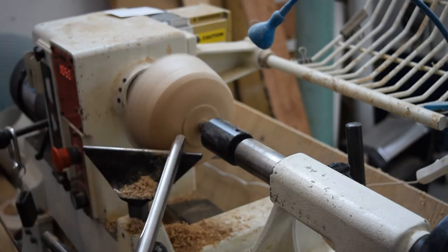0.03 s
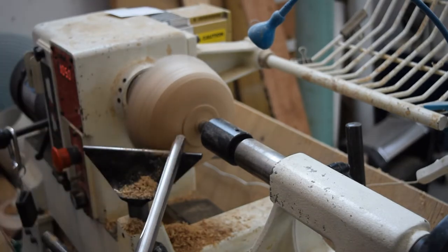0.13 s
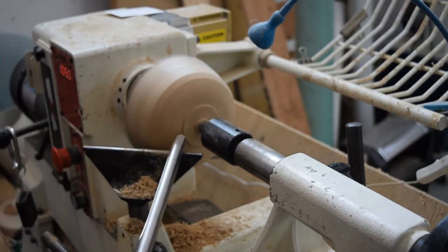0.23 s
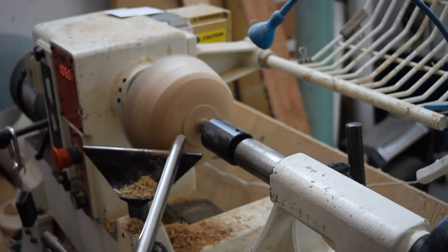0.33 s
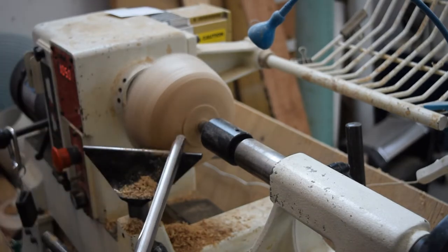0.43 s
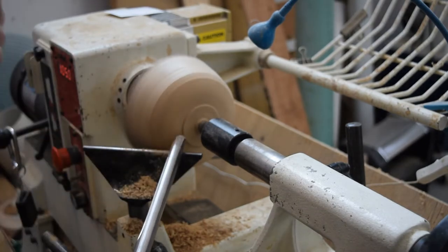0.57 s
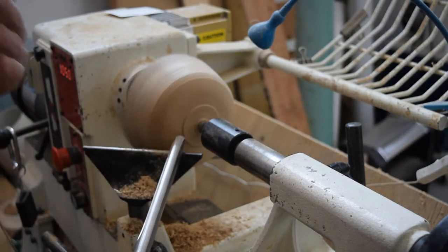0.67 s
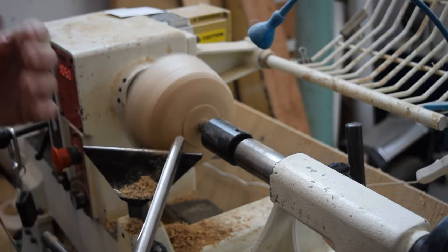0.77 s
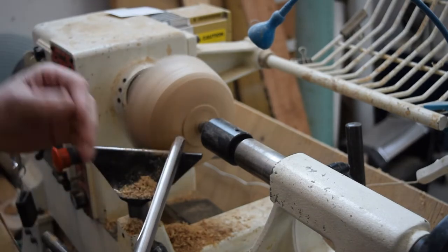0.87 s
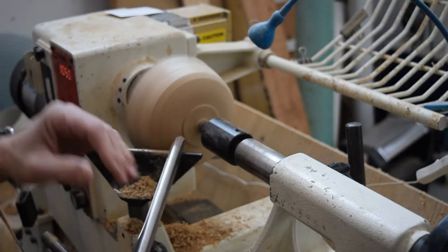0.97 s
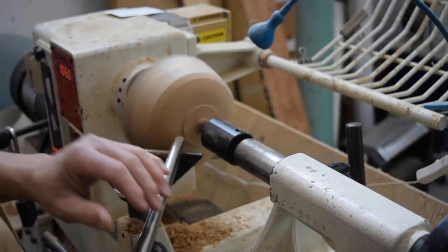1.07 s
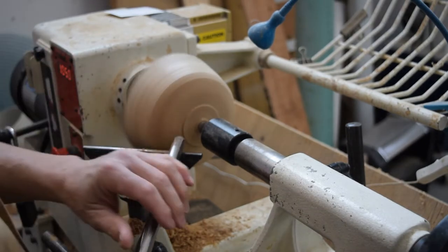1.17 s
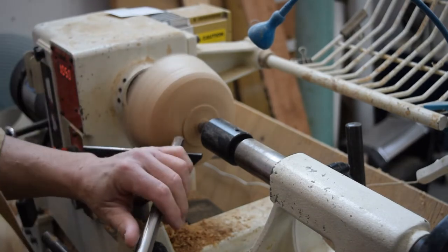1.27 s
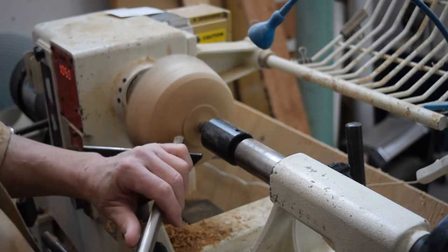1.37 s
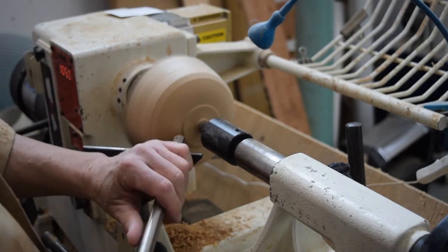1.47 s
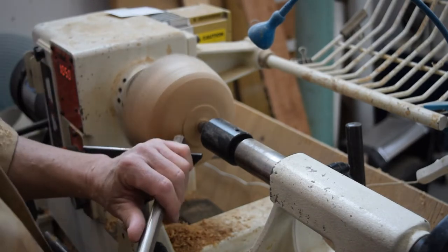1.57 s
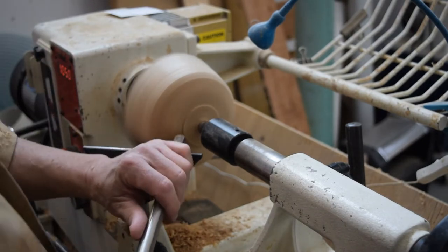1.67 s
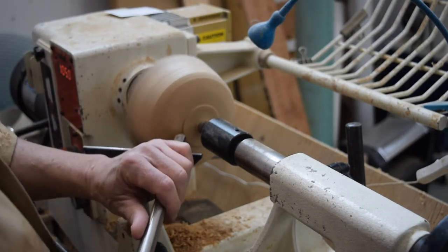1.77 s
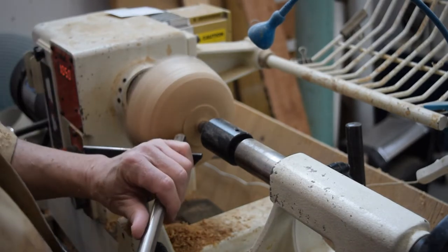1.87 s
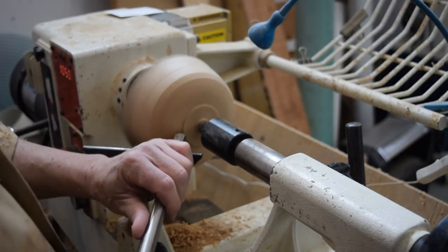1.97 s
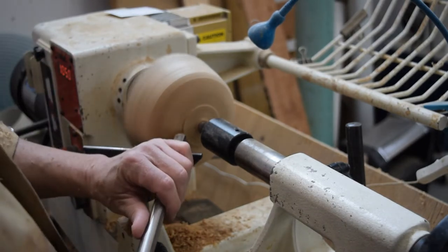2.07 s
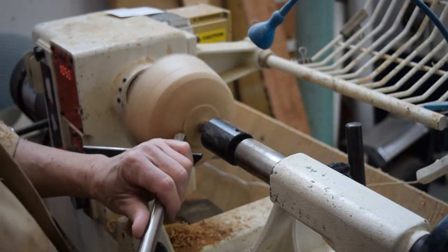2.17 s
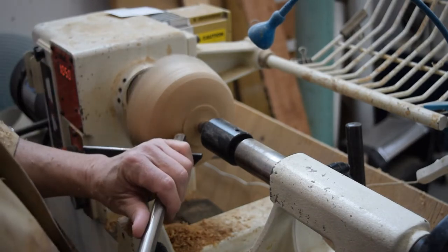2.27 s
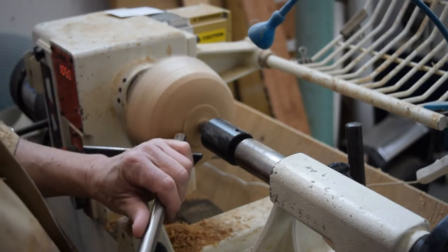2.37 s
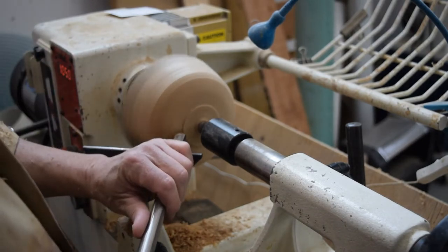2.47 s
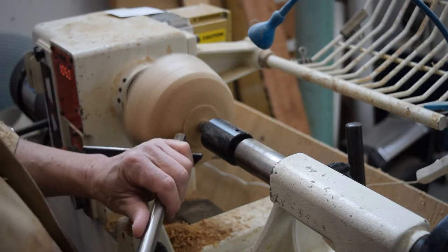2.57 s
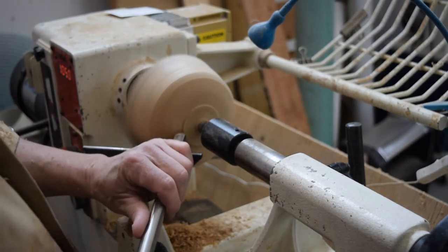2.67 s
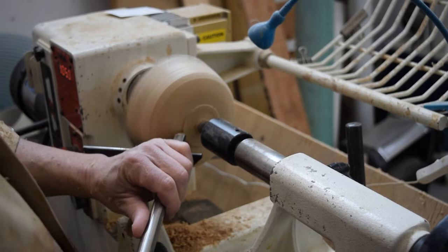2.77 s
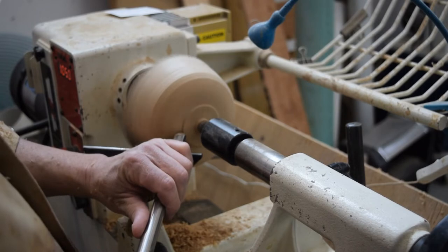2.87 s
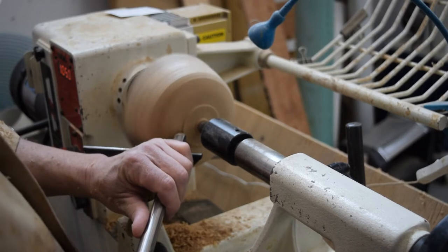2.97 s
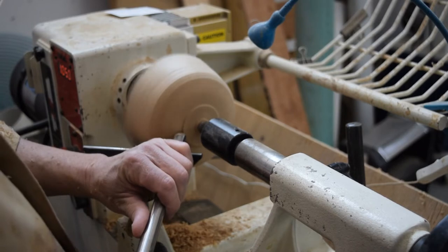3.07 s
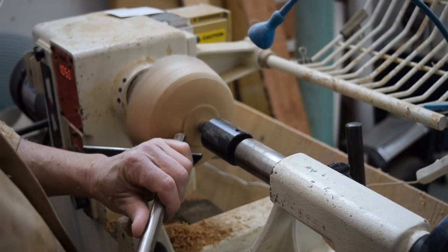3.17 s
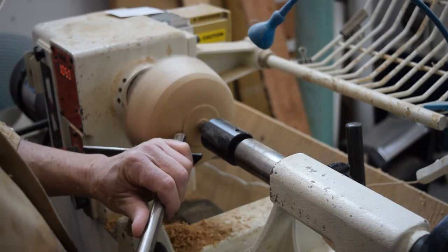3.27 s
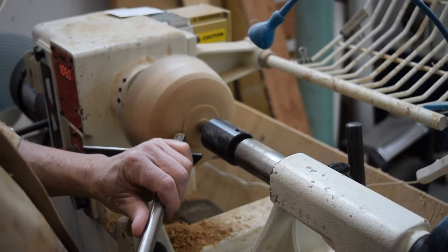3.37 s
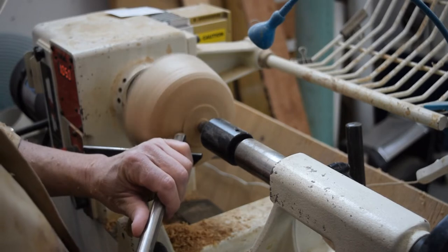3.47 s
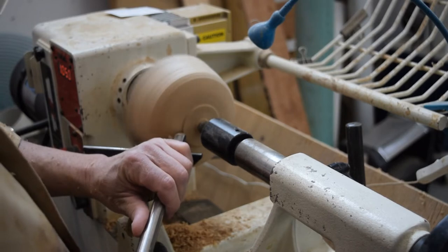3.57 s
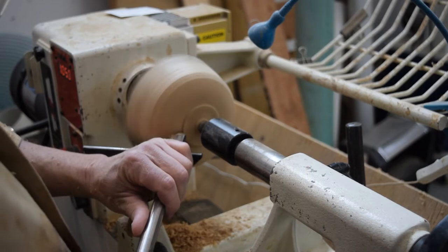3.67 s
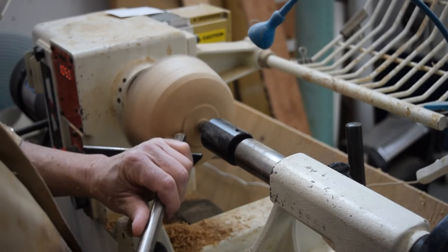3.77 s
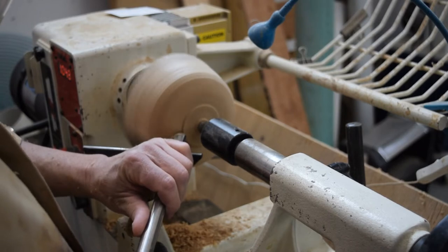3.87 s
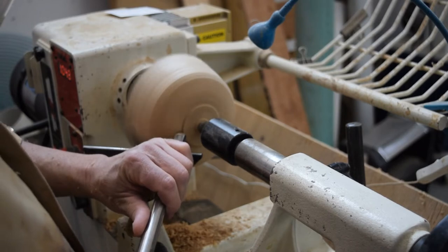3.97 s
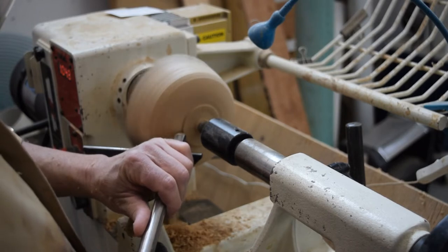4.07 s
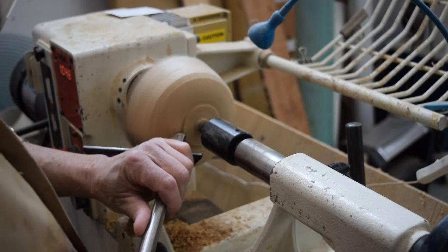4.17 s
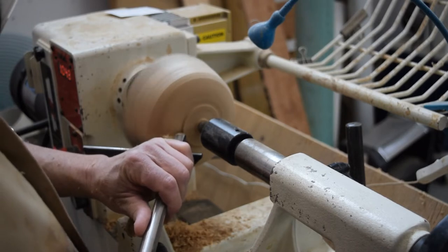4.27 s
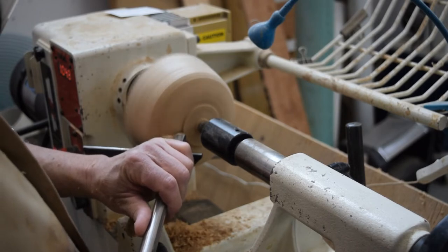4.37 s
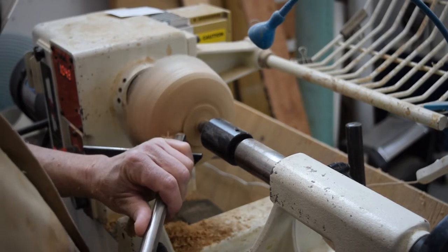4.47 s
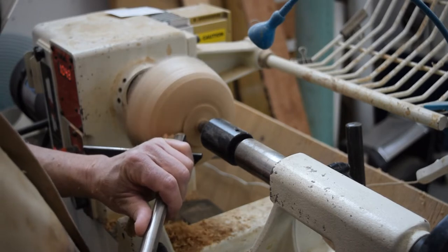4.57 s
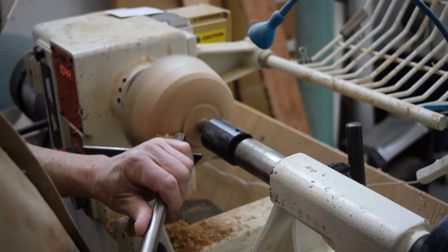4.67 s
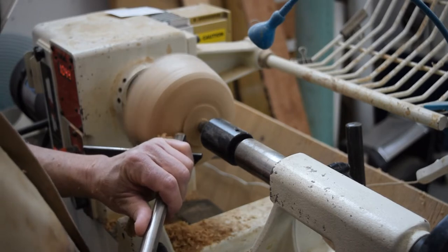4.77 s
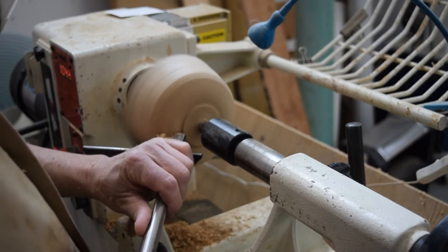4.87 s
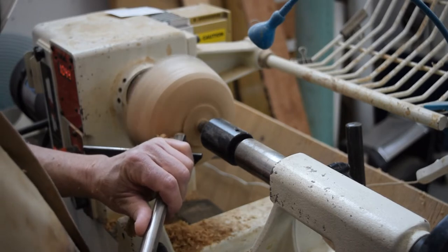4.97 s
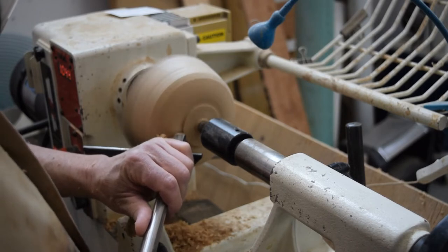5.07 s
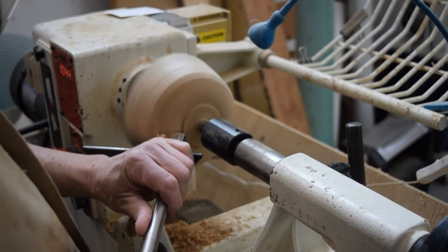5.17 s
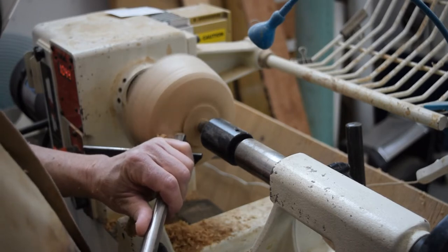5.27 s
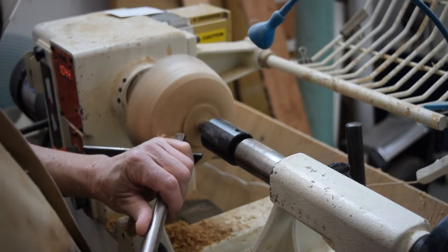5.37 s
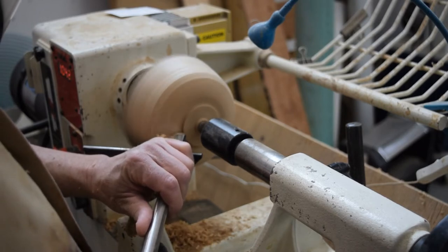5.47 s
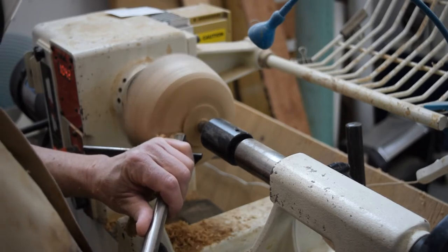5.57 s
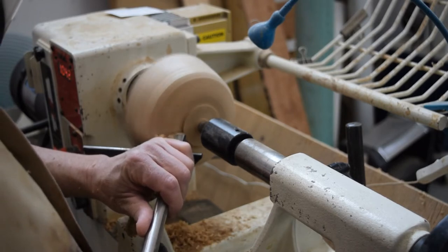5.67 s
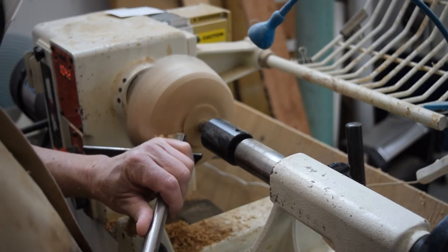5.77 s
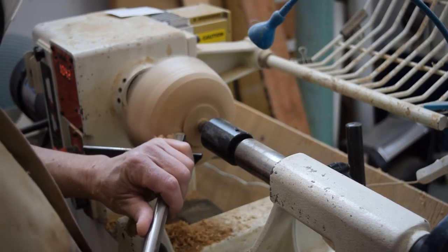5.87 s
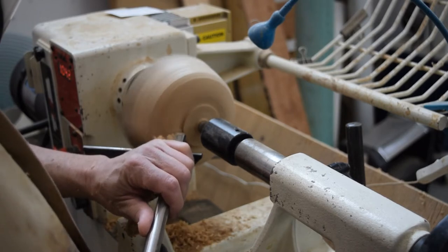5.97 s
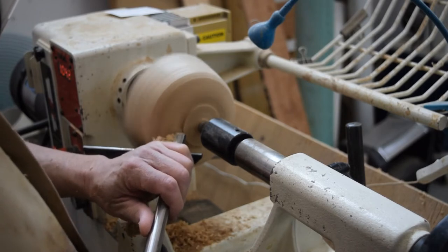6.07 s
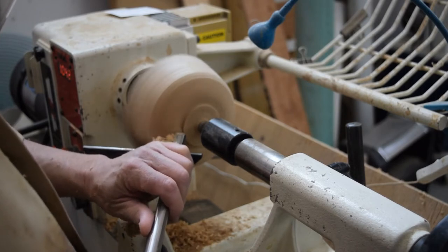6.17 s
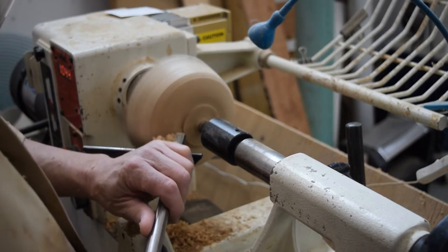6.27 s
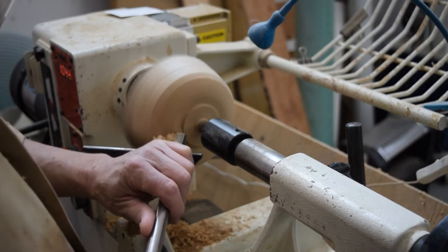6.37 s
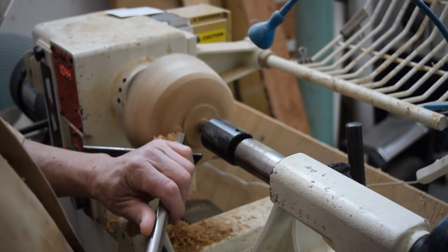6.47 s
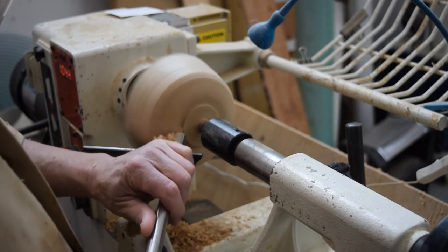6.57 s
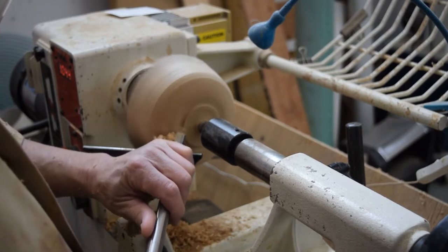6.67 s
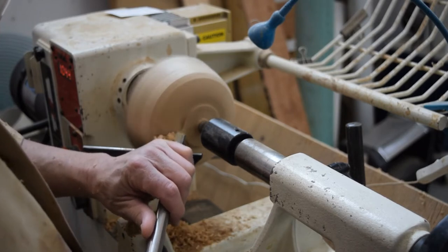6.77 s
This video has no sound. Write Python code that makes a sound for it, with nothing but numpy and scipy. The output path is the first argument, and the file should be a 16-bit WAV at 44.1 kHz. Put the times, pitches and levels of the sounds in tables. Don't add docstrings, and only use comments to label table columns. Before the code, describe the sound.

From 0 to about 2.3 seconds a wood lathe idles in a workshop: a steady electric hum around one kilohertz with a higher tone above it, soft bearing hiss and a thin, constant whine near ten kilohertz. At 2.4 the gouge touches the spinning dry bowl, with a few rough, uneven knocks that quickly merge into a rapid metallic rattle, about thirty-five pulses a second, ringing brightly at three to four kilohertz with crisp chip fizz. From 3.4 the cut deepens; by 4.4 to 5.8 it is a loud, dense, hollow roar with wall chatter and wavering, singing tones from the tool rest. Around 5.9 it drops abruptly to a lighter, clearer, ticking scrape, continuing until a harder bite at 6.8, where it ends mid-cut. The motor continues underneath throughout. The microphone is close, the stereo image slightly left, with short room reflections.

```python
import sys
import numpy as np
from scipy import signal
from scipy.fft import rfft, irfft, next_fast_len
from scipy.io import wavfile
from scipy.ndimage import uniform_filter1d

SR = 44100
rng = np.random.default_rng(int(sys.argv[2]) if len(sys.argv) > 2 else 0)


def int16_out(signal):
    q = np.round(np.clip(np.atleast_2d(signal).T, -1, 1) * 32767)
    wavfile.write(sys.argv[1], SR, q.astype(np.int16))


def nominal_scale(level):
    x = np.asarray(level, float) / 20
    return 10 ** x


N = 300762
T = np.arange(N) / SR
SPINDLE_HZ, SHAFT_HZ = 17.65, 21.0985
TOUCH_S, SWEEP_S, ROUNDING_S = 2.4, 4.4, 0.12


def evened(x):
    return x / np.sqrt(np.mean(x ** 2) + 1e-20)


def read(points, hz, column=1):
    table = np.transpose(points)
    return np.interp(np.log(hz + 1), np.log(table[0] + 1), table[column])


def curves(rows, before):
    s, *columns = np.transpose(rows)
    return [np.interp(T, s, column, left=before) for column in columns]


def colour(x, spectrum, modes, size=8192):
    hz = abs(np.fft.fftfreq(size, 1 / SR))
    humps = 1 + sum(nominal_scale(2 * db) / (1 + (2 * (hz - mode_hz) / width_hz) ** 2) for mode_hz, width_hz, db in modes)
    smooth = nominal_scale(np.maximum(read(spectrum, hz), -100))
    log_gain = np.log(smooth) + np.log(humps) / 2
    taps = np.fft.ifft(np.exp(np.conj(signal.hilbert(log_gain)))).real[:size // 2]
    return signal.oaconvolve(x, taps / np.linalg.norm(taps))[:N]


def one_mode(x, hz, width_hz):
    skirts = [(hz / 8, -75), (hz / 2, -42), (hz * 2, -42), (SR, -60)]
    return colour(x, skirts, [(hz, width_hz, 40)])


def wander(rate_hz, count=12):
    frame_s = np.arange(0, N + 256, 256) / SR
    rates = np.geomspace(rate_hz / 20, rate_hz, count)
    slow = sum(np.sin(2 * np.pi * (f * frame_s + rng.random())) for f in rates)
    return np.interp(T, frame_s, evened(slow))


def held(rows, rise_s=.1, fall_s=.2):
    out = np.zeros(N)
    for start_s, length_s, db in rows:
        rise = (T - start_s) / rise_s + .5
        fall = (start_s + length_s - T) / fall_s + .5
        shape = np.clip(np.minimum(rise, fall), 0, 1)
        out += nominal_scale(db) * np.sin(np.pi / 2 * shape) ** 2
    return out


def returning(turns, keep, size=2048):
    rows = rng.standard_normal((int(turns[-1]) + 3, size))
    keep = np.clip(keep, 0, .99)
    rows = signal.lfilter([np.sqrt(1 - keep ** 2)], [1, -keep], rows, axis=0, zi=keep * rows[-1:])[0]
    place = (turns % 1 * size).astype(int)
    return evened(rows[turns.astype(int), place])


# time in seconds, level in dB.
DEPTH_DB = [(2.28, -51), (2.37, -37.5), (2.41, -35), (2.5, -32.5), (2.7, -31.5), (2.85, -27), (3.1, -26),
            (3.3, -27.5), (3.7, -23), (4.3, -20.5), (4.6, -19.5), (5.0, -20), (5.4, -20.5), (5.77, -21),
            (5.97, -27), (6.3, -29.5), (6.74, -29), (6.82, -23)]


def cut_depth_db():
    return curves(DEPTH_DB, -120)[0]


def edge_sweep():
    return np.clip((T - TOUCH_S) / SWEEP_S, 0, 1)


def out_of_round():
    return np.exp(-np.maximum(T - TOUCH_S, 0) / ROUNDING_S)


# frequency in Hz, level in dB, t60 in seconds.
ROOM = [(40, -12, 0.18), (125, -25, 0.13), (438, -12, 0.2), (1710, -13.5, 1), (4600, -16, 0.0092),
        (8450, -6.5, 0.11), (13300, -5, 0.24)]
# frequency in Hz, left over right in dB.
LEFT_OVER_RIGHT = [(60, 0), (240, -0.6), (480, 3), (950, 4.8), (1890, 3.6), (3770, 2.8), (7520, 0.8),
                   (15000, 1.5)]


def shop(x):
    hz, t, z = signal.stft(rng.standard_normal(SR // 2), SR, nperseg=256)
    z = z * nominal_scale(-60 * t / read(ROOM, hz, column=2)[:, None])
    tail = signal.istft(z / np.linalg.norm(z, axis=1, keepdims=True), SR, nperseg=256)[1]
    size = next_fast_len(N + SR)
    hz = np.fft.rfftfreq(size, 1 / SR)
    delay_s = .004
    sides = rfft(tail / np.linalg.norm(tail), size) * nominal_scale(read(ROOM, hz))
    sides = sides * np.exp(-2j * np.pi * hz * delay_s)
    lean = nominal_scale(np.outer([.5, -.5], read(LEFT_OVER_RIGHT, hz)))
    ports = (lean + np.outer([1, -1], sides)) * 2 / lean.sum(0)
    return irfft(rfft(x, size) * ports, size)[:, :N]


def slot_tone(turns, order, db):
    twist_rad = 1.3
    phase = twist_rad * (order % 2) + 0.45 * wander(3.6)
    return nominal_scale(db + 0.36 * wander(8.8)) * np.sin(2 * np.pi * order * turns + phase)


# frequency in Hz, level in dB rms.
SLOT_TONES = [(403.7, -59), (737.5, -46), (780.6, -55), (802.1, -55), (845.2, -55), (925.9, -56),
              (990.5, -43), (1012, -39), (1034, -49), (1077, -53), (1098, -57), (1157, -59), (1265, -56),
              (1308, -58), (1389, -58), (1497, -59), (1561, -42), (1970, -64), (2304, -62), (2460, -66),
              (2643, -68)]
# frequency in Hz, level in dB rms.
DRIVE_WHINE = [(8269, -77), (8522, -79), (8775, -75), (9028, -69), (9114, -77), (9200, -75), (9281, -69),
               (9367, -74), (9453, -76), (9534, -74), (9620, -66), (9706, -74), (9787, -62), (9873, -67),
               (9959, -51), (10045, -54), (10126, -60), (10212, -62), (10234, -75), (10298, -75),
               (10465, -72), (10718, -73), (10804, -78), (10971, -64)]
# time in seconds, level in dB.
IDLE = [
    (0, -34),
    (2.3, -35.5),
]
# frequency in Hz, level in dB per Hz.
HISS_SPECTRUM = [(15, -47), (50, -36), (90, -29.5), (130, -17.5), (230, -20), (383, -12.5), (650, -22),
                 (900, -14), (1100, -11), (1460, -13.5), (1750, -14), (3000, -19.5), (8400, -37),
                 (11800, -45), (13000, -52), (15500, -62)]
# frequency in Hz, width in Hz, dB above the hiss.
HOUSING_MODES = [(395, 94, 4), (710, 123, 10), (976, 74, 8.5), (1550, 53, 7), (5100, 150, 4.5),
                 (10050, 780, 18.5)]


def motor():
    depth_db = cut_depth_db()
    load = np.clip((depth_db + 36) / 10, 0, 1)
    s, db = np.transpose(IDLE)
    idle = nominal_scale(np.interp(T, s, db) - np.mean(db))
    turns = SHAFT_HZ * np.cumsum(1 - 0.001613 * load + 0.000083 * wander(3)) / SR
    swell = load - np.clip((depth_db + 23.5) / 1.0, 0, 1)
    swell_hz, swell_width_hz, swell_db = 1012, 2.1, 8
    slots = np.zeros(N)
    for hz, db in SLOT_TONES:
        near = 1 / (1 + ((hz - swell_hz) / swell_width_hz) ** 2)
        slots += slot_tone(turns, round(hz / SHAFT_HZ), db + swell * swell_db * near)
    whine = np.zeros(N)
    for hz, db in DRIVE_WHINE:
        order_hz = round(hz / SHAFT_HZ) * SHAFT_HZ
        whine += nominal_scale(db) * np.sin(2 * np.pi * (order_hz * T + rng.random()))
    hiss = .6 * returning(turns, keep=.85) + .8 * rng.standard_normal(N)
    hiss = nominal_scale(-41) * colour(hiss, HISS_SPECTRUM, HOUSING_MODES)
    return np.sqrt(2) * (idle * slots + nominal_scale(0.14 * wander(7.3)) * whine) + idle * hiss


# time in seconds, lead in turns.
SPINDLE_LEAD = [
    (2.28, -0.181),
    (3.05, -0.085),
    (3.95, -0.019),
    (4.55, -0.002),
    (5.75, -0.01),
    (6.05, 0.004),
    (6.82, 0.138),
]


def spindle():
    s, lead = np.transpose(SPINDLE_LEAD)
    return SPINDLE_HZ * T + np.interp(T, s, lead) + 1


REST_ORDER = (7, 17, 21, 42, 31, 18, 19, 20, 40, 74, 84, 86, 92, 15, 16, 22, 23, 27, 33, 36, 45)
REST_SHAKE_DB = (-42, -17, -19, -26, -26, -22, -15, -24, -26, -24, -22, -22, -24, -25, -30, -19, -28, -28,
                 -25, -28, -28)
# start in seconds, length in seconds, level in
# dB.
REST_LOCKS = [
    [(2.85, 0.096, -61), (4.2, 0.11, -63), (5.03, 1.65, -54), (5.6, 0.096, -54.5)],
    [(2.37, 0.98, -38.5), (3.6, 0.31, -50), (4.1, .6, -61), (4.7, 1.03, -38.5), (6.05, 0.47, -48)],
    [(2.4, 0.24, -43), (2.65, .2, -39.5), (2.83, 1.13, -34), (3.98, 0.42, -26.5), (4.4, 0.46, -28.5),
     (5.05, 0.54, -24), (5.62, 0.17, -33), (6.0, .3, -50), (6.38, 0.66, -38.5)],
    [(4.05, 0.57, -37), (4.8, 0.23, -32.5), (5.6, 0.25, -31.5), (6.15, 0.048, -31)],
    [(2.9, 0.57, -47.5), (3.8, 0.54, -38.5), (4.7, 0.31, -39)],
    [(2.7, 0.77, -60), (4.35, 0.81, -40.5)],
    [(4.15, 0.16, -58)],
    [(2.4, 0.46, -48), (4.45, 0.39, -42), (5.2, 0.59, -38.5), (6.1, 0.35, -44.5)],
    [(4.25, 0.37, -33)],
    [(5.323, 0.15, -35)],
    [(4.42, 0.4, -31.5), (5.05, 0.11, -30.5), (5.33, 0.54, -30)],
    [(4.42, 0.53, -33), (4.9, 0.5, -29.5)],
    [(4.0, 0.2, -29), (4.83, 0.29, -28), (5.4, 0.74, -33.5)],
    [(2.9, 0.63, -64)],
    [(2.4, 1.4, -62)],
    [(3.4, 0.37, -50), (5.9, 0.43, -47.5)],
    [(2.45, 0.37, -44), (4.15, 0.61, -39), (5.1, 0.71, -40), (6.4, .3, -44.5)],
    [(2.45, 1.2, -53), (4.4, 0.44, -42.5)],
    [(4.2, 1.1, -54)],
    [(5.4, .45, -41), (6.1, 0.96, -47.5)],
    [(3.9, 0.81, -38), (5.15, 0.24, -41)],
]
REST_THROB = (.1, 0.3, 0.2, 0.17, .6, 0, 0, 0, .3, .3, .3, .3, .3, 0, 0, 0, 0, .2, .2, .2, .2)


def rest():
    depth_db, turns = cut_depth_db(), spindle()
    deep = np.clip((depth_db + 24) / 3, 0, 1)
    beat = deep * np.cos(2 * np.pi * turns - 1.8)
    scatter_rad = np.pi / 7 * (1 - .55 * deep)
    out = np.zeros(N)
    for order, db, locks, throb in zip(REST_ORDER, REST_SHAKE_DB, REST_LOCKS, REST_THROB):
        level = nominal_scale(depth_db + db + 2.4 * wander(2.3)) + held(locks)
        phase = scatter_rad * np.clip(order - 20, -6, 6) ** 2
        out += np.sqrt(2) * level * (1 + throb * beat) * np.sin(2 * np.pi * order * turns + phase)
    return out


def grain_peaks_db():
    reached_s, reaching_s = 2.73, 0.022
    missed = 1 / (1 + np.exp(np.clip((T - reached_s) / reaching_s, -30, 30)))
    return 7 - 15 * missed, 7 + 42 * out_of_round()


def end_grain(turns, depth, top_db=20, width=0.066, tail=0.07):
    gate = np.ones(N)
    for start, db in zip((0, .5), grain_peaks_db()):
        away = (turns - start + .5) % 1 - .5
        bump = np.exp(-.5 * (away / np.where(away < 0, width, tail)) ** 2)
        gate += (nominal_scale((depth * db).clip(-6, top_db)) - 1) * bump
    return gate / np.sqrt(uniform_filter1d(gate ** 2, round(SR / SPINDLE_HZ)))


def accents(turns, spread_db):
    passes = np.arange(2 * int(turns[-1]) + 4)
    return nominal_scale(spread_db * np.interp(2 * turns, passes, rng.standard_normal(len(passes))))


def chips(per_s=6000, spread_db=0.5):
    size = nominal_scale(spread_db * np.minimum(rng.exponential(1, N), 2.5))
    return evened(size * rng.standard_normal(N) * (rng.random(N) < per_s / SR))


def drive(ridges, fibres, share):
    return np.sqrt(share) * ridges + np.sqrt(1 - share) * fibres


# start in seconds, length in seconds, level in dB.
WALL_CHATTER = [
    (4.4, 0.42, -28.5),
    (4.9, 0.37, -30),
    (5.25, 0.5, -32),
    (2.85, 0.94, -44),
]


def chatter_marks():
    uneven, chatter = out_of_round(), held(WALL_CHATTER)
    wall_db = 20 * np.log10(nominal_scale(cut_depth_db() - 32 - 8 * uneven) + chatter)
    memory = .88 - 0.1 * chatter / chatter.max() - 0.38 * uneven
    return wall_db, np.clip(memory, 0, 1)


# start in seconds, length in seconds, level in dB.
BELLY_SPELLS = [
    (2.85, .55, -37),
    (3.42, .5, -31),
    (4.45, .4, -31),
    (5.25, .4, -32),
    (6.0, .8, -40),
]


def bowl_wall(turns, ridges, fibres):
    ripples = returning(turns, keep=0.81)
    wall_db, memory = chatter_marks()
    wall = one_mode(nominal_scale(wall_db + 1) * end_grain(turns, depth=.45) * ripples, hz=1520, width_hz=70)
    rim = one_mode(nominal_scale(wall_db - 6) * end_grain(turns, depth=0.29) * ripples, hz=1623, width_hz=35)
    force = drive(ridges, fibres, .6 * memory)
    belly = one_mode(held(BELLY_SPELLS) * end_grain(turns, depth=.6) * force, hz=1320, width_hz=150)
    return wall + rim + belly


# frequency in Hz, level in dB per Hz.
ROAR_SPECTRUM = [(18, -48), (60, -59), (110, -34.5), (200, -20), (280, -18), (430, -14.5), (500, -12),
                 (725, -9), (950, -9), (1520, -8), (2100, -7), (2740, -12), (3300, -8.5), (7000, -100)]
# frequency in Hz, width in Hz, dB above the roar.
BOWL_MODES = [(323, 143, 6), (378, 28, 10), (567, 13, -3), (695, 60, 1), (1350, 420, 7), (1710, 52, -19),
              (2296, 120, 10)]


def bowl_roar(turns, ridges, fibres):
    force = drive(ridges, fibres, chatter_marks()[1])
    return colour(nominal_scale(cut_depth_db()) * end_grain(turns, depth=0.31) * force, ROAR_SPECTRUM, BOWL_MODES)


# frequency in Hz, width in Hz, dB above the ring.
GOUGE_MODES = [(2995, 70, 11), (3135, 110, 10), (3275, 120, 9), (3655, 90, 11), (4030, 180, 10.5),
               (4250, 120, 9), (4510, 120, 7), (4630, 140, 10), (4830, 80, 8), (5630, 250, 9),
               (6380, 200, 6), (6930, 120, 15), (7330, 220, 8), (7870, 220, 12), (8730, 200, 11),
               (9220, 180, 9), (10740, 810, 9), (13250, 350, 6)]
# frequency in Hz, level in dB per Hz.
FIZZ_SPECTRUM = [(3820, -12.5), (6500, 0), (7290, -1.5), (7790, 2), (8360, 2.5), (8960, -0.5), (10300, -6)]
# frequency in Hz, level in dB per Hz.
SNAP_SPECTRUM = [(2000, -30), (3500, -4), (6000, -8), (11000, -8), (16000, -6)]


def cut_level_db(db, db_per_db, sweep_db):
    depth_db, medium_db = cut_depth_db(), -25
    return depth_db + db + db_per_db * (depth_db - medium_db) + sweep_db * edge_sweep()


def chip_fizz(turns, ridges, fibres):
    fizz_db = cut_level_db(db=-15.5, db_per_db=0.16, sweep_db=1.73)
    force = drive(ridges, fibres, 0.08 * chatter_marks()[1])
    gate = end_grain(turns, depth=1.45, top_db=11.5)
    fizz = colour(nominal_scale(fizz_db + 2.5) * gate * force, FIZZ_SPECTRUM, GOUGE_MODES)
    first_snaps_db = 4 * np.exp(-np.maximum(T - TOUCH_S, 0) / ROUNDING_S / 2)
    gate = end_grain(turns, depth=1.6, top_db=14)
    snaps = nominal_scale(fizz_db - 7 + first_snaps_db) * gate * chips(per_s=1800, spread_db=3.0)
    return fizz + colour(snaps, SNAP_SPECTRUM, GOUGE_MODES)


def steel_ring_db():
    return cut_level_db(db=0.11, db_per_db=0.15, sweep_db=-1.7)


def easing():
    return edge_sweep() ** 2 * np.clip((-24 - cut_depth_db()) / 4, 0, 1)


# frequency in Hz, level in dB per Hz.
RING_SPECTRUM = [(1290, -20), (2200, 12), (2790, -7.5), (3070, -3.5), (3460, -8.5), (4120, -1.5),
                 (5150, -6.5), (6370, -8), (7150, -38), (8500, -18.5), (11000, -32), (18700, -120)]


def steel_ring(turns, ridges, fibres):
    share = .08 + .2 * edge_sweep() + .5 * easing()
    gate = end_grain(turns, depth=0.6, top_db=9.0)
    return colour(nominal_scale(steel_ring_db()) * gate * drive(ridges, fibres, share), RING_SPECTRUM, GOUGE_MODES)


def singing(level, hz, width_hz, ragged, eased):
    flutter = evened(uniform_filter1d(rng.standard_normal(N), size=90))
    waver_hz = .13 * (1 - .7 * eased) * width_hz * wander(50)
    tone = np.sin(2 * np.pi * np.cumsum(hz + waver_hz) / SR)
    return np.sqrt(2 / (1 + ragged ** 2)) * level * (1 + ragged * flutter) * tone


# time in seconds, shank dB, tip dB.
BITES = [(2.28, -14, -14), (2.375, -14, -14), (2.417, 0, 0), (2.473, -1, -2), (2.53, 0, 1), (2.555, 2, 3),
         (2.586, 0, -1), (2.755, 0, 0), (2.783, -3.1, -2.5), (2.811, 0.7, 0.8), (2.839, -3.3, -0.8),
         (2.867, 2.2, 0.9), (2.895, -6.0, -0.4), (2.923, 2.9, -0.6), (2.952, -6.5, 1.1), (2.98, 2.8, -2.6),
         (3.008, -4.6, 1.4), (3.036, -0.4, -3.3), (3.064, -2.2, 2.8), (3.092, 3.2, -4.9),
         (3.121, -1.5, 2.2), (3.149, -1.0, -4.5), (3.177, -1.3, 1.6), (3.205, 2.3, -2.4),
         (3.233, -4.1, 0.7), (3.262, 2.3, -0.5), (3.29, -7.4, 0.1), (3.318, 2.1, 0.8), (3.346, -4.2, -0.3),
         (3.374, 2.2, -0.5), (3.403, -5.3, -1.1), (3.431, 1.7, 0.6), (3.459, -3.6, 0.0), (3.487, 1.9, -0.3),
         (3.516, -3.0, 1.0), (3.544, 0.5, -0.2), (3.572, -4.2, -0.1), (3.6, 1.3, 0.3), (3.628, 0.7, -1.0),
         (3.657, -0.8, 0.9), (3.685, 0.2, -1.6), (3.713, 0.4, -1.4), (3.741, 1.2, -0.0), (3.769, 0.2, -0.2),
         (3.798, -0.8, 0.2), (3.826, -1.9, 0.0), (3.854, 1.6, -2.0), (3.882, -1.2, 2.2), (3.911, 0.7, -0.9),
         (3.939, -2.0, -0.4), (3.967, -0.6, 1.7), (3.995, -0.9, -0.5), (4.024, -0.0, -0.3),
         (4.052, -0.5, -1.1), (4.08, 0.7, -1.8), (4.108, 1.7, -0.2)] + [(4.137, -1.0, 2.5), (4.165, 0.7, -2.3), (4.193, -1.0, 0.6), (4.222, -2.2, -1.9),
                            (4.25, 1.1, -0.4), (4.278, -4.4, 0.9), (4.306, 3.5, 0.0), (4.335, -4.5, 1.8),
                            (4.363, 0.8, -1.5), (4.391, -3.4, -0.3), (4.42, -0.9, -3.8),
                            (4.448, -1.9, -0.8), (4.476, 0.7, -1.3), (4.504, 0.8, 2.2), (4.533, 0.0, -2.2),
                            (4.561, 2.9, 1.9), (4.589, -4.0, -1.0), (4.618, -0.3, 1.2), (4.646, -0.9, -1.6),
                            (4.674, -2.3, 0.1), (4.703, -0.3, -1.0), (4.731, 0.2, -1.3), (4.759, -2.3, 2.6),
                            (4.788, 0.6, -2.7), (4.816, 1.7, 1.1), (4.844, -0.2, -0.8), (4.873, 0.8, -0.6),
                            (4.901, -2.1, -1.2), (4.929, 0.3, 1.8), (4.958, -1.6, -2.6), (4.986, 2.1, -0.7),
                            (5.014, -1.5, 0.3), (5.043, 1.4, -0.5), (5.071, -1.8, 1.6), (5.099, -0.4, -0.8),
                            (5.128, -0.1, 0.9), (5.156, 0.7, -0.8), (5.184, -0.7, -1.1),
                            (5.213, -1.7, -0.9), (5.241, -2.3, 1.5), (5.269, 2.9, 0.3), (5.298, -1.9, -0.2),
                            (5.326, 1.1, -0.2), (5.354, -3.8, 0.9), (5.383, 1.5, -1.4), (5.411, -0.4, 0.2),
                            (5.439, 0.4, -4.3), (5.468, 0.7, 1.0)] + [(5.496, -0.3, 1.5), (5.524, -1.3, -0.7),
                                                 (5.553, -0.9, 0.1), (5.581, 0.7, 0.7), (5.61, -2.3, -0.1),
                                                 (5.638, 1.8, -1.5), (5.666, 0.5, -2.3), (5.695, -0.8, 0.4),
                                                 (5.723, 0.7, 0.4), (5.751, -0.6, 0.9), (5.779, 1.6, -0.6),
                                                 (5.808, -1.7, 1.6), (5.836, -0.2, 0.1),
                                                 (5.864, -1.0, -2.0), (5.892, -0.4, 1.2),
                                                 (5.921, -2.3, -3.2), (5.949, 0.9, 0.1),
                                                 (5.977, -3.0, -5.1), (6.005, 0.8, 1.0),
                                                 (6.034, -2.5, -1.8), (6.062, 2.2, 2.1), (6.09, -2.8, -3.0),
                                                 (6.118, 1.5, 1.9), (6.146, -3.8, -3.4), (6.174, 2.9, 2.5),
                                                 (6.202, -2.0, -3.1), (6.23, -2.0, -1.0),
                                                 (6.258, -1.9, -0.8), (6.286, 1.3, 1.7),
                                                 (6.314, -1.5, -2.7), (6.342, 0.5, 0.8), (6.37, -1.9, -0.4),
                                                 (6.399, 1.3, 1.4), (6.427, -0.4, -1.1), (6.455, 0.1, 1.7),
                                                 (6.483, 1.1, -2.1), (6.511, -1.0, -1.0),
                                                 (6.539, -1.6, -2.4), (6.567, -0.8, 1.4),
                                                 (6.595, 1.2, -0.3), (6.623, 2.1, 0.6), (6.651, -1.6, -1.4),
                                                 (6.679, -2.4, 0.1), (6.707, -4.4, -1.3),
                                                 (6.735, 0.8, -1.0), (6.763, -4.2, -0.6),
                                                 (6.791, 2.2, -0.6), (6.816, 1.1, 3.2)]


def bites_db():
    return curves(BITES, 0)


# time in seconds, tip in Hz, shank in Hz.
STEEL_TUNING = [(2.4, 4070, 3125), (2.78, 4060, 3135), (2.9, 4000, 3140), (3.4, 4010, 3130),
                (4.3, 4035, 3115), (5.7, 4030, 3135), (6.0, 4065, 3160), (6.6, 4065, 3165),
                (6.8, 4060, 3215)]
# frequency in Hz, width in Hz, dB over the ring,
# dB per dB of depth past light, dB once the cut eases.
FLUTE_MODES = [(3650, 120, -16, .4, -3), (4620, 200, -16, .3, -6), (4480, 160, -22, 0, 11),
               (3275, 140, -17, .8, 2), (4250, 140, -14, 0, 0), (4360, 160, -28, 0, 17),
               (4830, 80, -23, .9, -6)]


def steel_knocks(turns):
    ring_db, sweep, eased = steel_ring_db(), edge_sweep(), easing()
    shank_bite_db, tip_bite_db = bites_db()
    tip_hz, shank_hz = curves(STEEL_TUNING, 4070)
    knock = end_grain(turns, depth=2.4, top_db=22)
    knock = knock ** (1 + .35 * eased)
    past_db = np.maximum(ring_db + 28, 0)
    ragged = .3 * np.clip(.4 + past_db / 8 + sweep, 0, 1)
    tip_db = ring_db - 0.65 * np.maximum(ring_db + 28.5, 0) - 6.5 * sweep + 1.25 * tip_bite_db
    out = singing(nominal_scale(tip_db) * knock, tip_hz, 200, ragged, eased)
    shank_db = ring_db - 7.5 + .22 * past_db + 1.25 * shank_bite_db
    out += singing(nominal_scale(shank_db) * knock, shank_hz, 200, ragged, eased)
    for hz, width_hz, db, slope, drift_db in FLUTE_MODES:
        flute_db = ring_db + db + slope * past_db + drift_db * eased + tip_bite_db
        level = nominal_scale(flute_db) * knock * accents(turns, spread_db=1.0)
        out += singing(level, hz, width_hz, ragged, eased)
    return out


def cut():
    turns = spindle()
    force = turns, returning(turns, keep=0.926), chips()
    bowl = (bowl_roar(*force) + bowl_wall(*force)) * accents(turns, spread_db=0.51)
    shank_db, tip_db = bites_db()
    noise = (steel_ring(*force) + chip_fizz(*force)) * nominal_scale(.6 * (shank_db + tip_db) / 2)
    return bowl + steel_knocks(turns) + noise


def scene():
    return shop(motor()) * nominal_scale([[.8], [-1.]]) + shop(cut() + rest())


# frequency in Hz, gain in dB.
MIC_COLOUR = [(15, -6), (60, -2), (100, 0), (13800, 0), (14600, -5), (15700, -9)]


def microphone(x):
    size = next_fast_len(N)
    gain = nominal_scale(read(MIC_COLOUR, np.fft.rfftfreq(size, 1 / SR)))
    return irfft(rfft(x, size) * gain, size)[:, :N]


def band_limit(x):
    return signal.sosfilt(signal.butter(12, 15680, fs=SR, output="sos"), x)


def record(dry):
    mix = np.clip(microphone(dry), -1, 1)
    return band_limit(mix)


dry = scene()
out = record(dry)
int16_out(out)
```